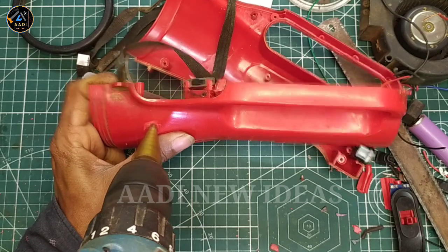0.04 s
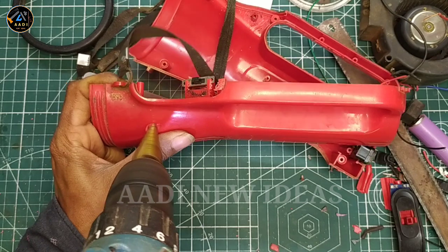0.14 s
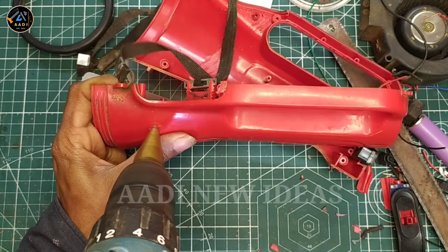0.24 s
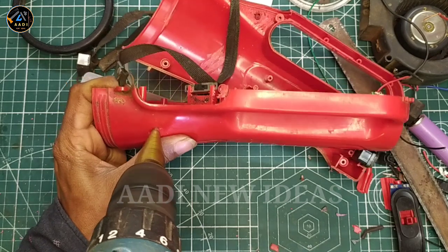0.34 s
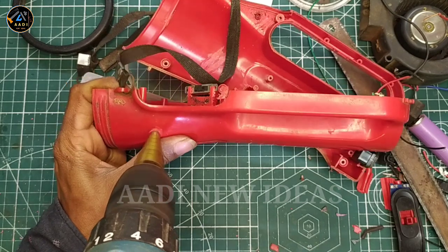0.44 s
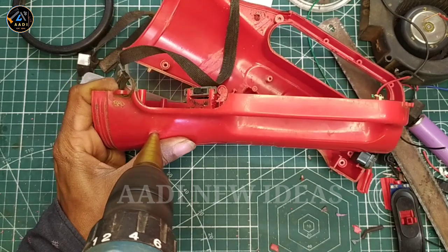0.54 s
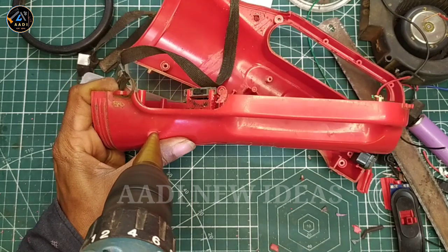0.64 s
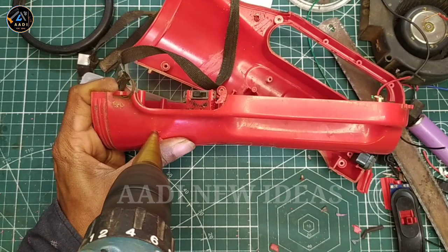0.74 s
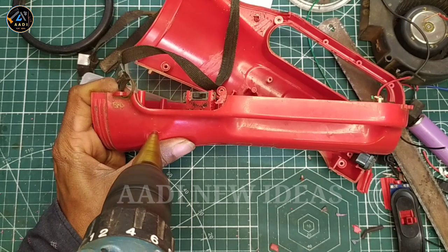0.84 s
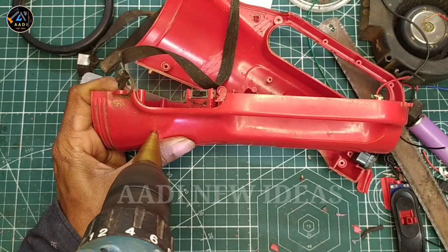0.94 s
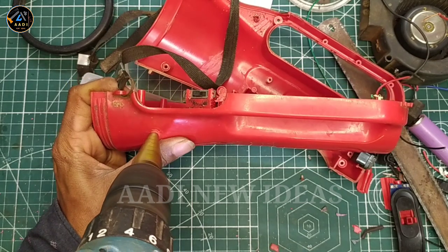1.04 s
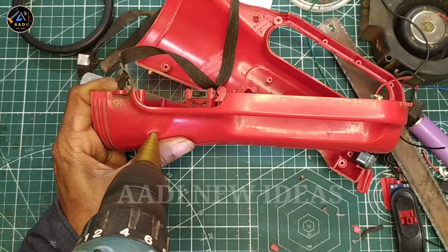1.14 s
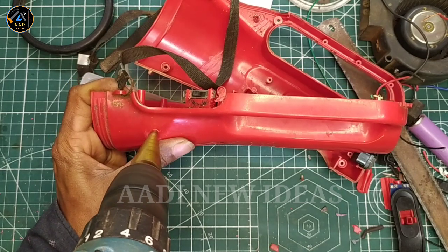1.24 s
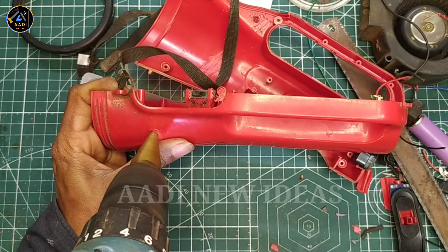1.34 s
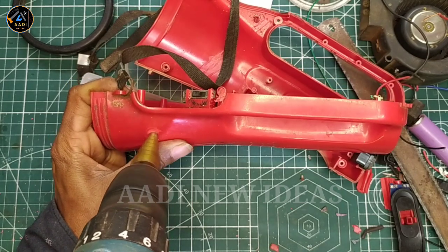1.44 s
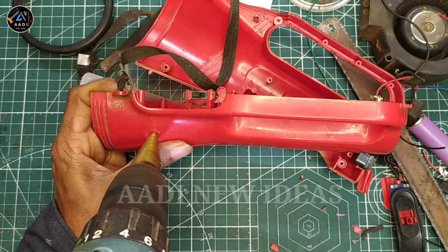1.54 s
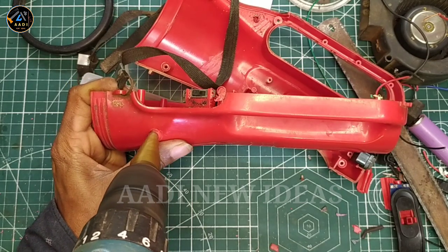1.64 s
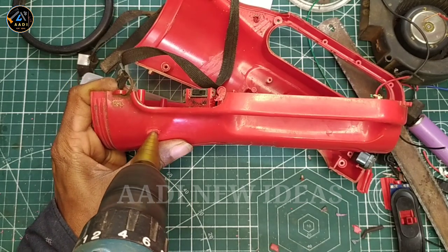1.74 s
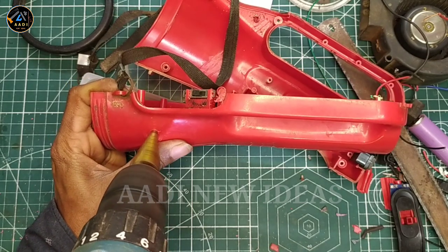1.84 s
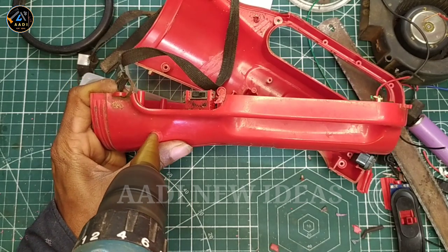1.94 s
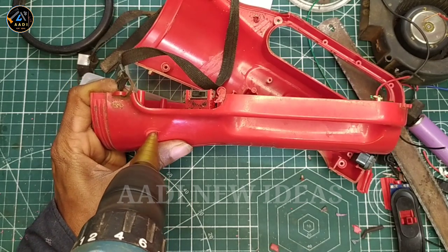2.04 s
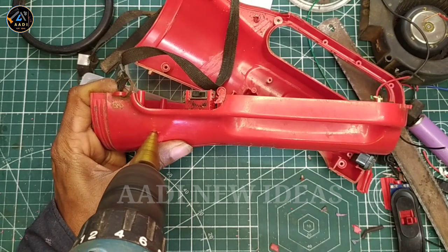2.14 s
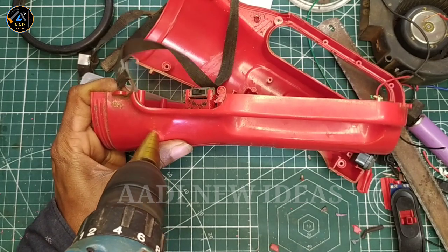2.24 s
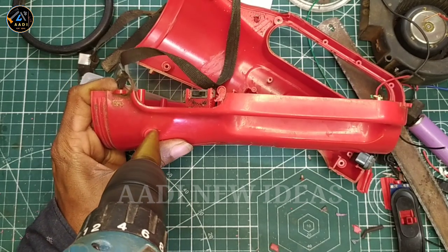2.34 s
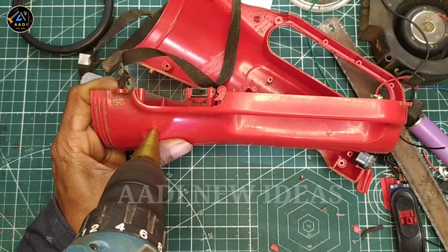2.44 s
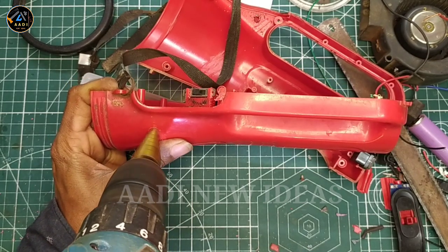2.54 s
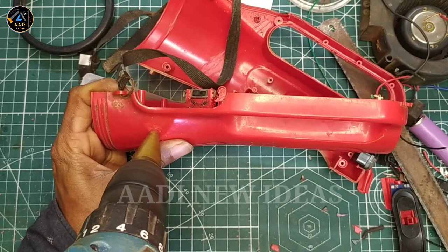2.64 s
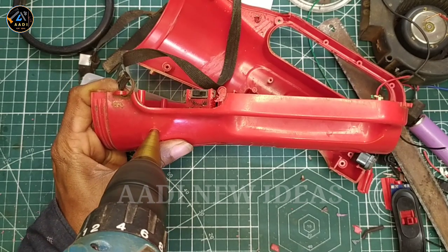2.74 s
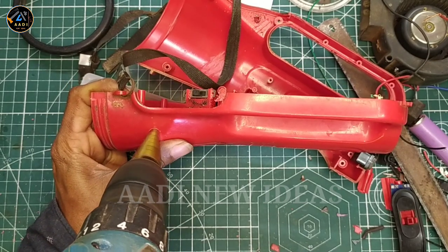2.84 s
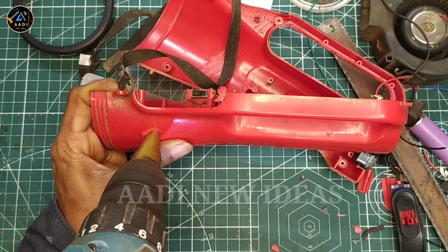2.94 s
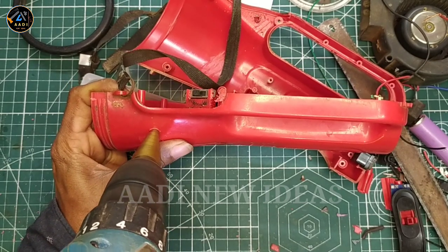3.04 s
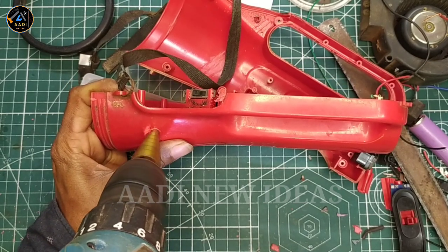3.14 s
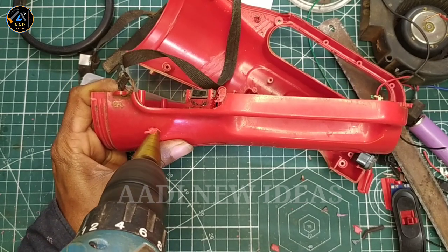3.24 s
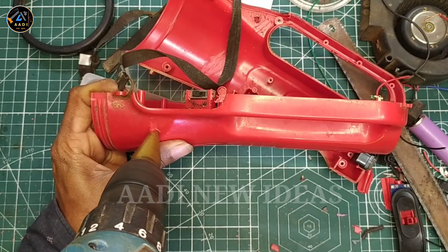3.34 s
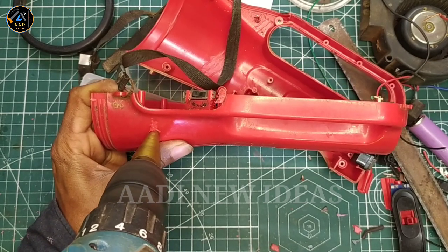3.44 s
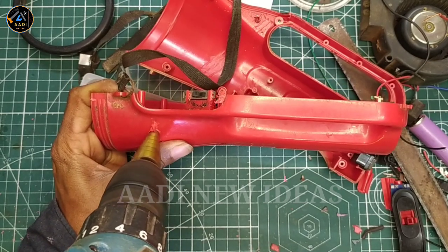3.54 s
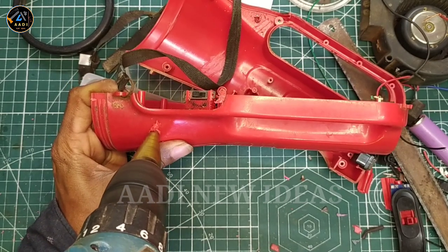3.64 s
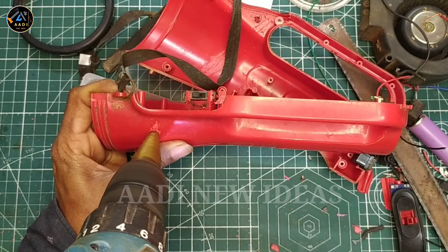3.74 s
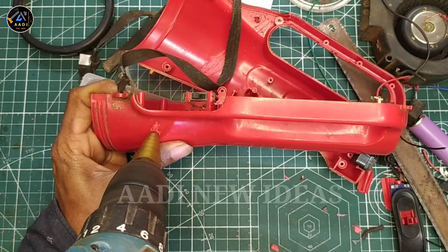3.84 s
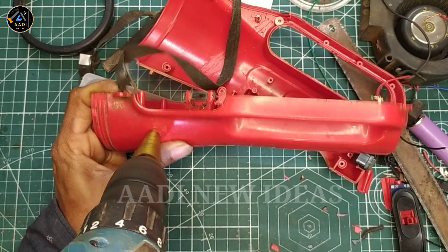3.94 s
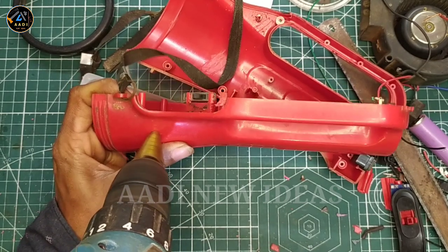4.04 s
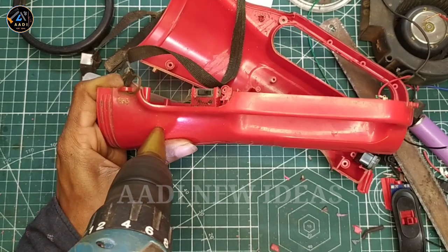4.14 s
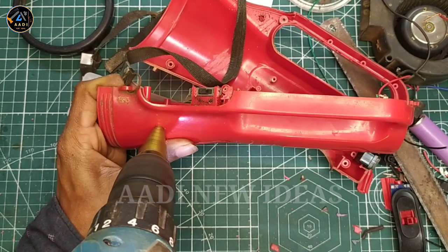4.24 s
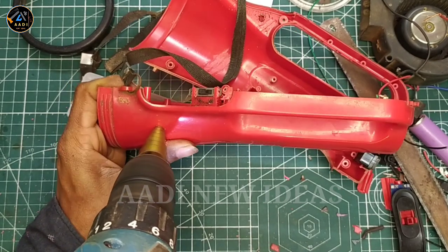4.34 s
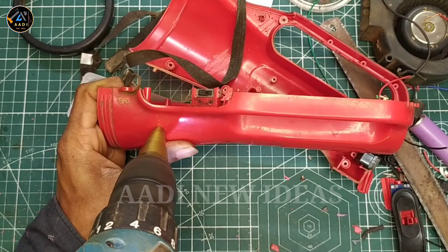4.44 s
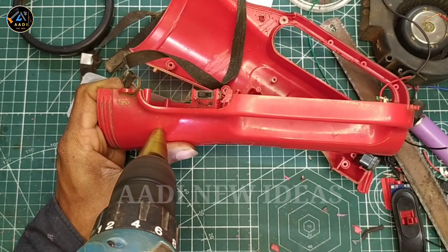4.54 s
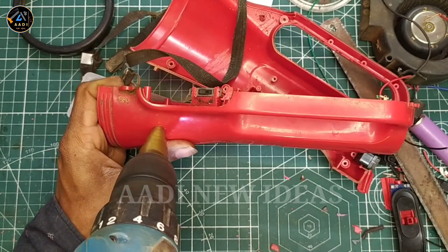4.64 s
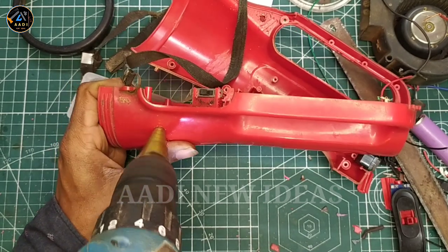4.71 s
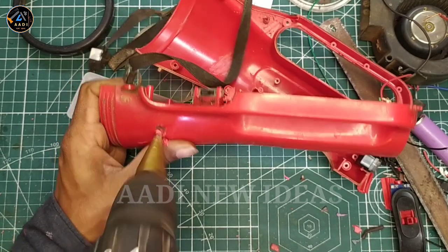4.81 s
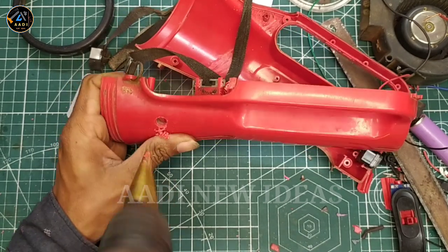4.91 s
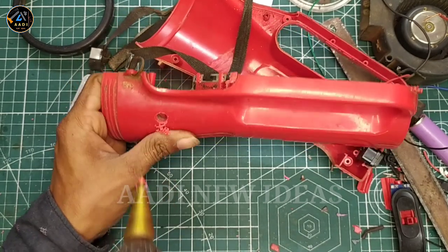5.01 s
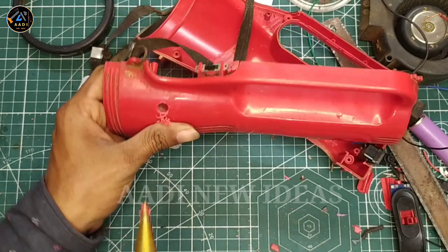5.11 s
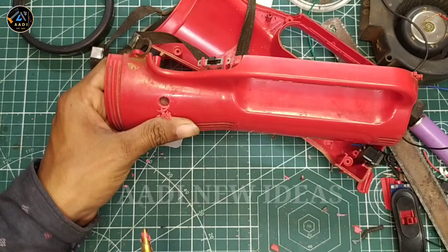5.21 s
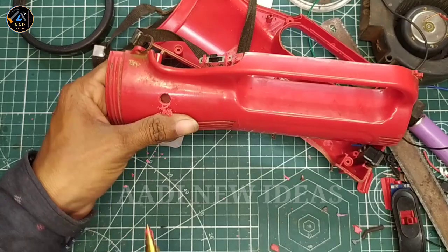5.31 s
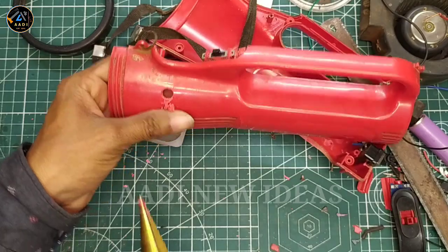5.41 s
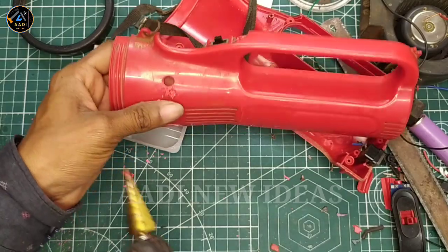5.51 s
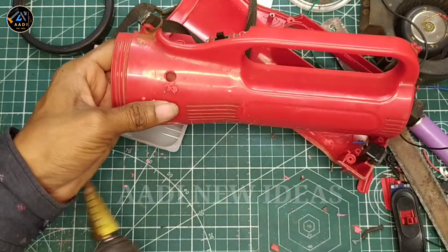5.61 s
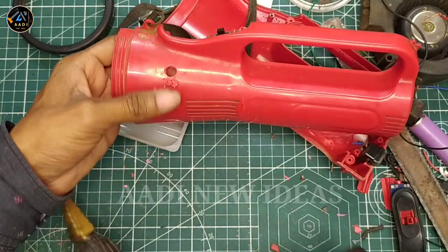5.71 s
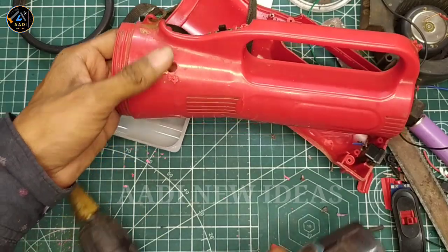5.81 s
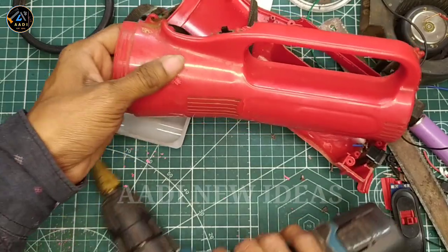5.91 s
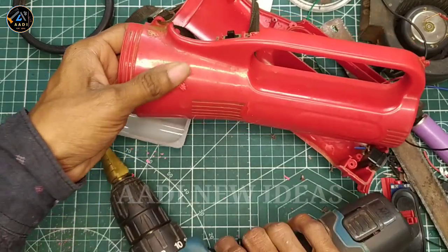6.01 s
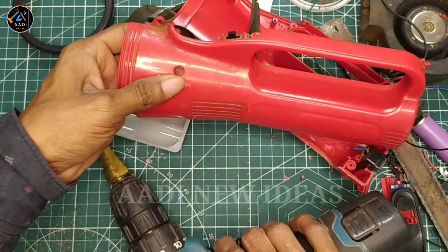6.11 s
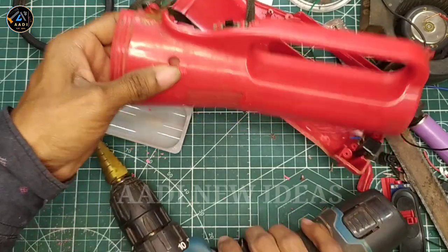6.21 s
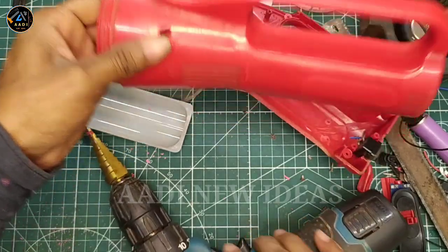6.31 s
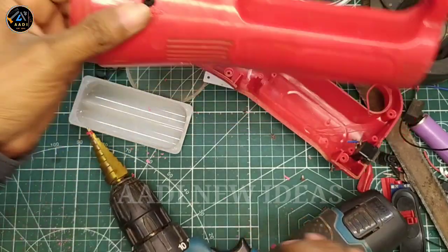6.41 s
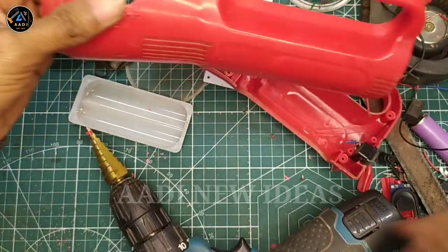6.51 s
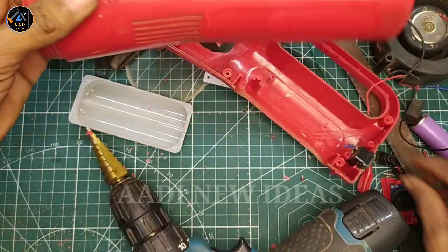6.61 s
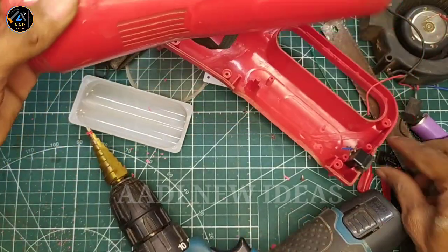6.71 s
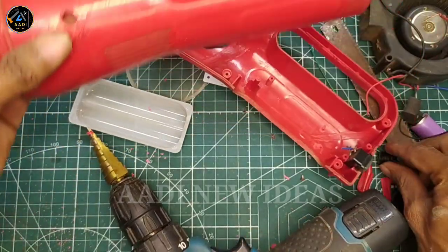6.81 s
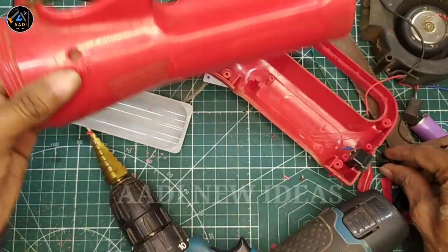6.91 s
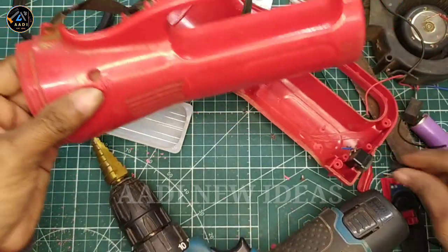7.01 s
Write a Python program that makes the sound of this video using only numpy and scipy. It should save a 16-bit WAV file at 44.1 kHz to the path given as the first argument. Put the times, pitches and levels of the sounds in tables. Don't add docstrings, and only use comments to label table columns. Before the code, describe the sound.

In a small, faintly humming room, a cordless drill is already boring a hollow plastic housing close to a stereo microphone. Its bright gear whine and hissy rattle rise, then sag under load, with a jolt through the bench. The bit breaks through, the gears roughen and the brake snaps it silent with a loud clack. Fingers rub the plastic softly, then the drill lands with hard knocks and a low thud, followed by light handling taps.

```python
import sys
import numpy as np
from scipy import signal
from scipy.fft import rfft, irfft, next_fast_len
from scipy.io import wavfile
from scipy.ndimage import uniform_filter1d, map_coordinates

SR = 44100
rng = np.random.default_rng(int(sys.argv[2]) if len(sys.argv) > 2 else 0)


def how_loud(loudness_db):
    steps = np.asarray(loudness_db, float) / 20
    return 10 ** steps


def pcm_store(signal):
    levels = np.round(np.clip(np.atleast_2d(signal), -1, 1) * 32767)
    wavfile.write(sys.argv[1], SR, levels.astype(np.int16).T)


N = 311346
TIME = np.arange(N) / SR


def unit(x):
    return x / np.sqrt(np.mean(x ** 2) + 1e-20)


def along(points, hz):
    f, v = np.transpose(points)
    return np.interp(np.log(hz + 1), np.log(f + 1), v)


def curves(rows):
    s, *cols = np.transpose(rows)
    return [np.interp(TIME, s, c) for c in cols]


def wobble(rate):
    knots = rng.standard_normal(int(N * rate / SR) + 4)
    return map_coordinates(knots, [np.arange(N) * rate / SR])


def filtered(x, response):
    m = next_fast_len(x.shape[-1] + 8192)
    return irfft(rfft(x, m) * response(np.fft.rfftfreq(m, 1 / SR)), m)[..., :x.shape[-1]]


def peak(f, hz, width):
    return 1j * f * width / (hz * hz - f * f + 1j * f * width)


# resonance_hz, width_hz, level_db
PORT_CAVITIES = [(9740, 2500, 7), (8847, 680, 17.5)]


def ports(f):
    return np.array([1 + how_loud(db) * peak(f, hz, width) for hz, width, db in PORT_CAVITIES])


# frequency_hz, likeness (0 to 1)
COHERENCE = [(60, 0.36), (130, 0.94), (300, 0.83), (700, 0.67), (2000, 0.53), (5000, 0.14), (15000, 0.13)]


def rush(spectrum, lag_ms=.2, tint=lambda f: 1, patchy_db=1.5):
    z = signal.stft(rng.standard_normal((2, N)), nperseg=512)[2]
    field = uniform_filter1d(rng.standard_normal(z.shape[1:]), size=5, axis=0)
    field = uniform_filter1d(field, size=30, axis=1)
    pair = signal.istft(z * how_loud(patchy_db * unit(field)), nperseg=512)[1][:, :N]

    def mid_side(f):
        angle = np.arccos(np.clip(along(COHERENCE, f), -1, 1)) / 2
        return how_loud(along(spectrum, f)) * [np.cos(angle), np.sin(angle)]

    def late(f):
        return tint(f) * np.exp(np.outer([-1j, 1j], np.pi * f * lag_ms / 1000))

    mid, side = filtered(pair, mid_side)
    return unit(filtered(np.array([mid + side, mid - side]), late))


# frequency_hz, width_hz, level_db
STANDING_WAVES = [(125.6, 12, 6.5), (159, 13, 4), (198.4, 10, 9.5), (240, 20, 6)]


def room_modes(f):
    return 1 + sum(how_loud(db) * np.abs(peak(f, hz, width)) for hz, width, db in STANDING_WAVES)


# frequency_hz, density_db (per Hz)
HUM_SPECTRUM = [(12, -42), (20, 4.5), (70, -10.5), (119, -17), (139, -7.5), (199, -10), (216, -16),
                (326, -12.5), (350, -18.5), (387, -21), (1200, -30), (1560, -57), (2640, -120)]


def room_hum():
    level = how_loud(-49.5 + 0.93 * wobble(10.0))
    return level * rush(HUM_SPECTRUM, lag_ms=.05, tint=room_modes)


# frequency_hz, t60_s
REVERBERATION = [(200, 0.49), (2000, 0.27), (10000, 0.34)]


def walls(x):
    hz, t, z = signal.stft(rng.standard_normal((2, SR // 2)), SR, nperseg=256)
    decay = how_loud(-60 * t / along(REVERBERATION, hz)[:, None])
    tail = signal.istft(z * decay, SR, nperseg=256)[1]
    delayed = np.pad(x, ((0, 0), (300, 0)))
    return signal.fftconvolve(delayed, tail / np.linalg.norm(tail[0]), axes=1)[:, :N]


# frequency_hz, density_db (per Hz)
RUB_SPECTRUM = [(4500, -42), (6000, -6), (7500, -2.5), (9000, 1), (10800, -8.5), (12000, -15), (15300, -13)]
# frequency_hz, density_db (per Hz)
SCRAPE_SPECTRUM = [(200, -29), (400, -5.5), (900, -9.5), (2000, -11), (4500, -14.5), (6500, -28),
                   (8000, -46)]
# peak_s, spread_s (per 10 dB), hiss_db, coarseness_db
FINGER_STROKES = [
    (5.25, 0.44, -51.5, -2),
    (5.63, 0.2, -50.5, -8),
    (5.71, .07, -52.5, 3.5),
    (6.15, 0.22, -47, -0.5),
    (6.28, 0.23, -49, 3.5),
    (6.42, 0.11, -55.5, 18.5),
    (6.51, 0.0664, -33, -6.5),
    (6.87, .11, -51, -4.5),
    (6.98, 0.1, -51.5, -3.5),
]
HOLD_DB = -64.5


def hands():
    quiet = np.clip((TIME - FINGER_STROKES[0][0]) * 15, 0, 1)
    swells = np.array([db - 10 * np.abs(TIME - s) / spread for s, spread, db, _ in FINGER_STROKES])
    coarse_db = np.transpose(FINGER_STROKES)[3][:, None]
    hiss_db = np.maximum(HOLD_DB, swells.max(axis=0))
    scrape_db = np.maximum(HOLD_DB + 5, (swells + coarse_db).max(axis=0))
    grip_db = 3.2 * wobble(40) + 0.58 * wobble(300) + 1.0
    hiss = how_loud(hiss_db) * rush(RUB_SPECTRUM, lag_ms=.1)
    scrape = how_loud(scrape_db) * rush(SCRAPE_SPECTRUM, lag_ms=0.15, patchy_db=2.0)
    return quiet * how_loud(grip_db) * (hiss + scrape)


# start_s, end_s, from_hz, to_hz, level_db
THUMB_SLIPS = [
    (5.40, 5.50, 9500, 8500, -66),
    (6.80, 6.94, 10100, 12500, -62),
]


def squeaks():
    out = np.zeros(N)
    for start, end, from_hz, to_hz, db in THUMB_SLIPS:
        u = np.clip((TIME - start) / (end - start), 0, 1)
        hz = from_hz + (to_hz - from_hz) * u + 40 * wobble(150)
        whistle = np.sin(2 * np.pi * np.cumsum(hz) / SR)
        out += how_loud(db + 2.5 * wobble(80)) * np.sin(np.pi * u) ** .5 * whistle
    return out


# start_s, level_db, hardness_db, t60_s
BENCH_BLOWS = [
    (.271, -28.5, 5.5, 0.58),
    (2.384, -21, 2, .15),
    (6.154, -20.5, -11.5, 0.89),
    (6.402, -6.5, -7, 0.25),
    (6.475, -18, -27, 0.88),
]
# frequency_hz, level_db, t60_s
BENCH_MODES = [(52.5, -15.5, 0.83), (100.4, -19, 0.99), (162, -13, 0.85), (192, -8.5, 0.42),
               (238, 5, 0.096), (301, -6.5, 0.18), (370, -13, 0.066)]
# frequency_hz, level_db, t60_s
SURFACE_MODES = [(530, 4.5, 0.013), (729, -11, 0.1), (980, -8, 0.054)]


def bench():
    out, t = np.zeros(N + SR), np.arange(SR // 2) / SR

    def ring(modes):
        return sum(how_loud(level + rng.normal(0, 0.78) - 60 * t / life) * np.sin(2 * np.pi * hz * t)
                   for hz, level, life in modes)

    for s, db, hard_db, t60 in BENCH_BLOWS:
        build_up = 1 - np.exp(-(t / 0.0057) ** 2)
        boom = how_loud(-30 * t / t60) * build_up * ring(BENCH_MODES)
        out[round(s * SR):][:len(t)] += how_loud(db) * (boom + how_loud(hard_db) * ring(SURFACE_MODES))
    return out[:N]


# start_s, peak_db, shell_hz, shell_db, t60_s
CONTACTS = [(5.1435, -2.5, 2840, -16, 0.053), (5.4086, -42, 2060, -8, 0.081),
            (5.565, -38, 1007, -12, 0.056), (5.6159, -31.5, 2820, -22, 0.12),
            (5.8319, -28.5, 2020, -13, 0.039), (6.0492, -39, 829, -17, 0.077),
            (6.076, -32.5, 1680, -21, 0.07), (6.113, -28.5, 1930, -16, 0.12),
            (6.1363, -17.5, 2900, -8.5, 0.14), (6.153, -22.5, 1570, 5, 0.056),
            (6.2006, -7.5, 1320, -10, 0.069), (6.3253, -19.5, 1320, -9, 0.098),
            (6.3733, -25.5, 920, 3, 0.053), (6.4014, -5.5, 730, -4, 0.057), (6.473, -12.5, 845, -24, 0.07),
            (6.7366, -31, 2470, -17, 0.07), (6.7994, -43, 802, -15, 0.067),
            (7.0311, -19.5, 1390, -18, 0.17)]
# frequency_hz, density_db (per Hz)
CRACK_SPECTRUM = [(290, 11), (500, -14), (1330, -6), (2130, -8), (2840, -9), (7470, -11), (8990, -4.5),
                  (14400, -29), (15000, -40)]
BENCH_PAN_DB, PAN_PER_DB = 1, 0.1266


def taps():
    out, t = np.zeros((2, N + SR)), np.arange(SR // 3) / SR
    for s, db, hz, shell_db, t60 in CONTACTS:
        pan_db = BENCH_PAN_DB + PAN_PER_DB * db
        fade = how_loud(-60 * t / max(t60, .01)) + 0.62 * how_loud(-60 * t / 0.021)
        bumps = rng.normal(0, 6.5, 40)

        def colour(f):
            low_cut = f ** 4 / (f ** 4 + 450 ** 4)
            return how_loud(along(CRACK_SPECTRUM, f) + np.interp(f, np.arange(40) * 400, bumps)) * low_cut

        crack = unit(filtered(rng.standard_normal((2, len(t))), colour))
        hollow = unit(filtered(rng.standard_normal(len(t)), lambda f: peak(f, hz, 0.071 * hz)))
        clatter = how_loud(2.1 * map_coordinates(rng.standard_normal(150), [t * 300]))
        onset = 1 - np.exp(-t / 0.0019)
        body = how_loud(-7.5) * clatter * crack + how_loud(shell_db - 3.5 - 60 * t / 0.31) * hollow
        sides = how_loud(db + np.array([[pan_db], [-pan_db]]) / 2)
        out[:, round(s * SR):][:, :len(t)] += sides * fade * onset * body
    return out[:, :N]


# start_s, end_s, level_db
LEANING = [
    (.15, .6, -50.5),
    (.82, 1.05, -44.5),
    (1.546, 4.05, -47.5),
    (4.1, 5.055, -42),
]
# frequency_hz, density_db (per Hz)
RUMBLE_SPECTRUM = [(70, -40), (110, -1.5), (160, 11.5), (230, -0.5), (300, -22)]
# frequency_hz, density_db (per Hz)
SHUDDER_SPECTRUM = [(15, -10), (30, 4), (60, -7), (100, -10), (130, -33)]


def bench_rumble():
    fade_s = .1
    leaning = how_loud(-64)
    for start, end, db in LEANING:
        leaning = leaning + how_loud(db) * np.clip(.5 + np.minimum(TIME - start, end - TIME) / fade_s, 0, 1)
    rumble = how_loud(-3.0) * leaning * rush(RUMBLE_SPECTRUM, tint=room_modes)
    return rumble + how_loud(-54.0 + 3.1 * wobble(2.16)) * rush(SHUDDER_SPECTRUM)


# time_s, level_db
WORK = [(0, -20.5), (1.6, -19.5), (2.2, -18.5), (3.5, -19), (4.1, -18), (4.47, -20.5), (4.73, -21),
        (5.1, -21.5)]
# peak_s, rise_s, fall_s, looseness_db, strain_db
LOAD_SURGES = [
    (4.79, 0.059, 0.27, 5.5, 0.5),
    (4.95, .17, 0.092, 6, 10.5),
    (5.117, 0.02, 0.025, 9, 5.5),
    (5.146, 0.0053, 0.021, 10, 13.5),
]
GRIND_DB, GRIND_GROWS = -26.5, 0.53
CUT_DB, CUT_GROWS = -35.5, -0.56
CUT_LOOSE, CUT_STRAIN = 0.45, 0.14
BRAKE_S, SILENT_S = 5.146, 5.32
RATTLE_DIES, GRIND_DIES, CUT_DIES = 270, 135, 180
GRIND_LETS_GO_DB = 13


def effort():
    work_db, = curves(WORK)
    tents = np.array([np.clip(np.minimum(1 + (TIME - s) / rise, 1 - (TIME - s) / fall), 0, 1)
                      for s, rise, fall, _, _ in LOAD_SURGES])
    loose_db, strain_db = np.transpose(LOAD_SURGES)[3:] @ tents
    swing_db = work_db - WORK[0][1]
    after = np.clip(TIME - BRAKE_S, 0, None)
    rattle_db = work_db + loose_db - RATTLE_DIES * after
    gearbox_db = GRIND_DB + GRIND_GROWS * swing_db + strain_db - GRIND_DIES * after
    gearbox_db -= GRIND_LETS_GO_DB * np.clip(after / 0.021, 0, 1)
    cutting_db = CUT_DB + CUT_GROWS * swing_db + CUT_LOOSE * loose_db + CUT_STRAIN * strain_db
    return rattle_db, gearbox_db, cutting_db - CUT_DIES * after


# frequency_hz, left_minus_right_db
BALANCE = [(60, -46), (180, -3.5), (540, -2.5), (1640, -1.5), (4930, 1), (14800, -26)]


def lean(f):
    return how_loud(np.outer([.5, -.5], along(BALANCE, f)))


# frequency_hz, density_db (per Hz)
RATTLE_SPECTRUM = [(5000, -70), (5900, -10), (6500, -10.5), (7600, -9.5), (8300, -8), (9200, -5),
                   (10400, -10), (11000, -11), (11600, -14), (12400, -23.5), (13500, -18.5), (15300, -19)]
# frequency_hz, density_db (per Hz)
GEARBOX_SPECTRUM = [(530, -38), (900, -17), (1800, 0), (1930, -0.5), (2090, 1.5), (2470, 3), (4940, -10.5),
                    (6060, -3), (7500, -9), (9750, -49), (16500, -120)]
# frequency_hz, density_db (per Hz)
CUTTING_SPECTRUM = [(120, -66), (200, -11), (249, -3.5), (371, -6.5), (833, 0), (1060, -3), (1600, -3.5),
                    (2080, 2), (3520, -120)]
CARRIER = 2 / 9


def gear_noise(turn):
    rattle_db, gearbox_db, cutting_db = effort()
    beat = np.cos(CARRIER * turn + 0.5 * wobble(2.95))
    clashes_db = 2.6 * np.tanh(wobble(450) / 2) + 0.33 * wobble(40)
    bursts = unit(how_loud(2.14 * beat + 0.96 * np.cos(turn) + clashes_db))
    grind = unit(how_loud(0.53 * beat + 1.96 * wobble(300) + 1.04 * wobble(25.244)))
    sound = how_loud(rattle_db + 3.5) * bursts * rush(RATTLE_SPECTRUM, tint=ports)
    sound += how_loud(gearbox_db + 2.5) * grind * rush(GEARBOX_SPECTRUM, tint=lean, patchy_db=1.6)
    return sound + how_loud(cutting_db + 3.5 + 0.49 * wobble(20)) * rush(CUTTING_SPECTRUM, tint=lean)


# slow_mesh_multiple, left_db, right_db, clean_share
MESH_TONES = [(1, -15.5, -9, 0.69), (2, -6.5, -27, 0.75), (3, -8.5, -2.5, 0.65), (4, -0.5, 1, 0.46),
              (5, 4.5, 2.5, 0.22), (6, 1.5, -27, 0.78), (7, -3.5, -20, 0.56), (8, 2, 1, 0.67),
              (9, -4.5, -28, 0.083), (10, -17, -3.5, 0.086), (12, 7, 6.5, 0.026), (16, 3, -10, .05),
              (20, -9, -15, .02)]
SLOW_MESH = 7 / 3
OTHER_MESH_DB, LOADED_SPEED, FADE_DB_PER_TURN = -35, 250, 0.21
THROUGH_S, UNLOADED_DB = 4.3, -6.5


def mesh_tones(speed, turn, main_db):
    others_db = OTHER_MESH_DB - FADE_DB_PER_TURN * np.abs(speed - LOADED_SPEED)
    others_db += UNLOADED_DB * np.clip((TIME - THROUGH_S) / 0.1, 0, 1)
    others_db -= 700 * np.clip(TIME - 5.1, 0, None)
    slack = 0.019 * wobble(30)
    mesh = np.zeros((2, N))
    for k, left_db, right_db, clean in MESH_TONES:
        width_hz = 70 + 32 * k
        for side, db in enumerate((left_db, right_db)):
            uneven = wobble(width_hz) + 1j * wobble(width_hz)
            smear = clean * how_loud(5.6 * wobble(20)) + .7 * uneven
            tone = np.real(smear * np.exp(1j * k * (SLOW_MESH * turn + slack)))
            mesh[side] += how_loud(db + (main_db if k == 4 else others_db)) * tone
    return filtered(mesh, ports)


# shaft_multiple, level_db
MOTOR_TONES = [(1, -43.5), (3, -43.5)]


def motor_tones(turn, main_db):
    tones = sum(how_loud(db + 0.69 * wobble(9.5)) * np.cos(k * turn + 0.12 * wobble(15))
                for k, db in MOTOR_TONES)
    return tones * how_loud(.5 * (main_db + 23.5))


# time_s, turns_per_s
SHAFT_SPEED = [(0.0, 263.0), (.125, 262.2), (.36, 256), (.6, 279.5), (.875, 288), (1.0, 284.4),
               (1.4, 260.5), (1.625, 252.7), (2.15, 250.8), (2.4, 243), (2.625, 254.3), (3.375, 246.4),
               (4.0, 246.2), (4.2, 241), (4.4, 264), (4.55, 263.5), (4.75, 253), (5.125, 240.3)]
# time_s, level_db
TOOTH_PRESSURE = [(0, -26.5), (.4, -28), (.55, -33), (1.15, -33.5), (1.5, -30), (2, -33), (2.4, -29),
                  (4.2, -31), (4.33, -32), (5.1, -52), (5.16, -80)]


def drill():
    speed, = curves(SHAFT_SPEED)
    main_db, = curves(TOOTH_PRESSURE)
    turn = 2 * np.pi * np.cumsum(speed) / SR
    running = np.clip((SILENT_S - TIME) * 30, 0, 1)
    body = gear_noise(turn) + bench_rumble()
    return running * (body + mesh_tones(speed, turn, main_db) + motor_tones(turn, main_db))


def scene():
    hits = taps() + bench()
    echo = how_loud(-7.5) * walls(hits)
    return room_hum() + hands() + squeaks() + hits + echo + drill()


def roll_off(x):
    return signal.sosfilt(signal.butter(12, 15430, fs=SR, output="sos"), x)


def record(dry):
    heard = filtered(dry, lambda f: 1j * f / (1j * f + 36))
    rounded = heard / (1 + np.abs(heard / 1.2) ** 3) ** (1 / 3)
    return roll_off(np.clip(rounded, -1, 1))


dry = scene()
out = record(dry)
pcm_store(out)
```